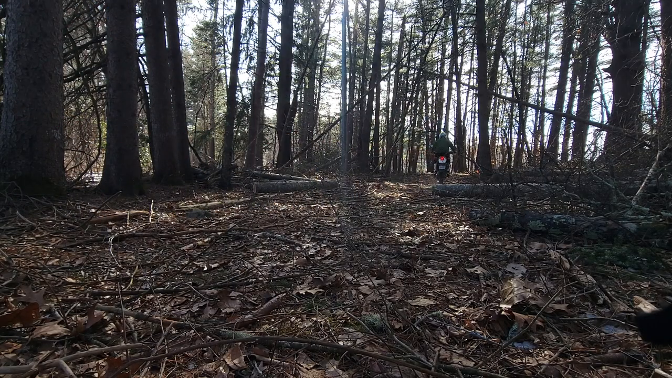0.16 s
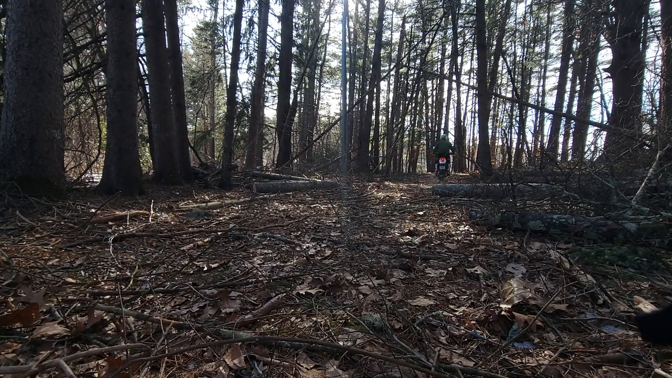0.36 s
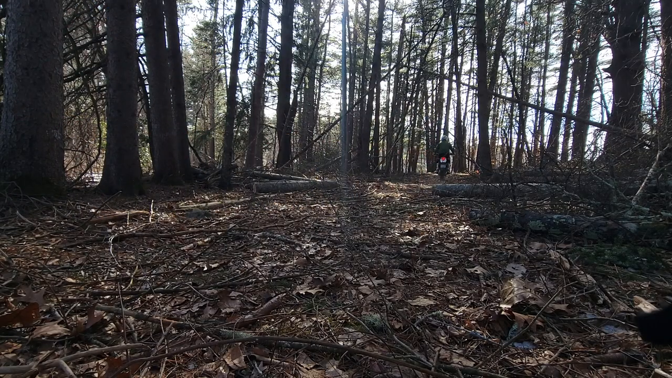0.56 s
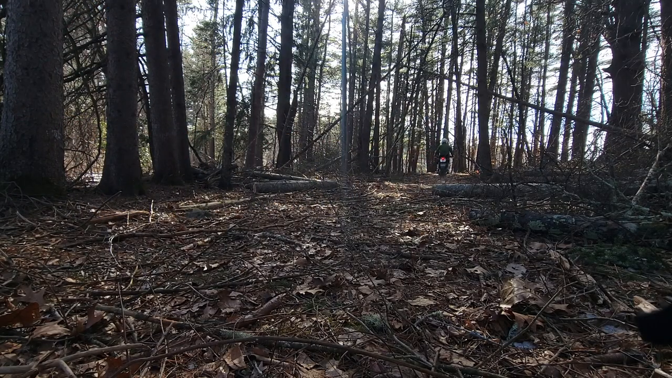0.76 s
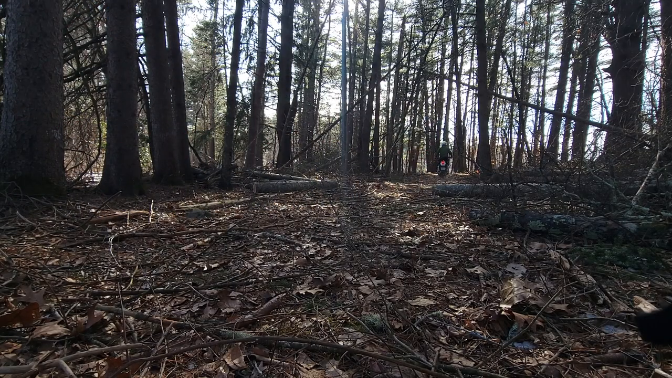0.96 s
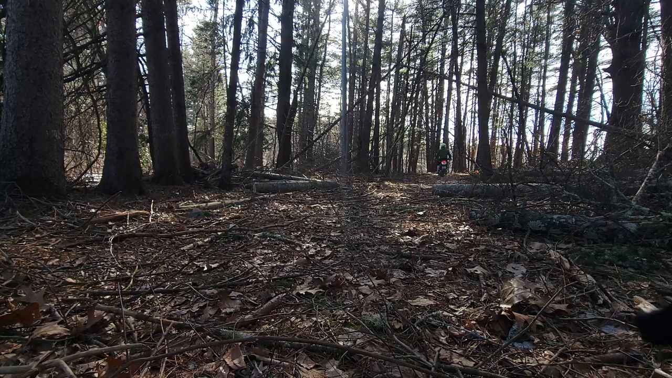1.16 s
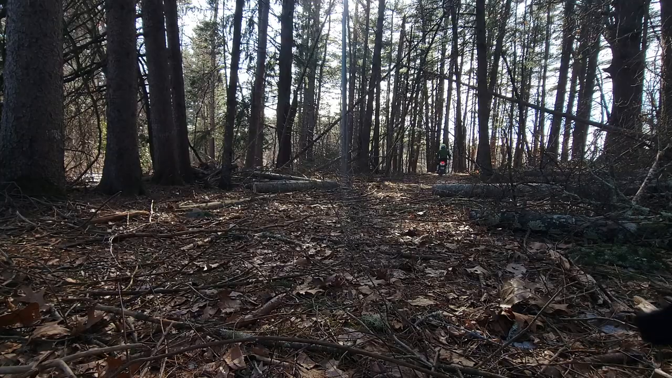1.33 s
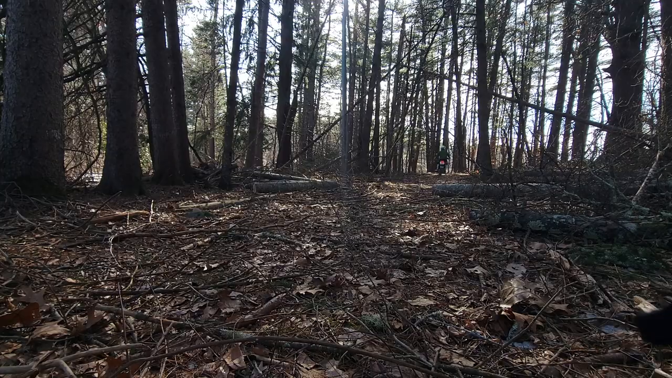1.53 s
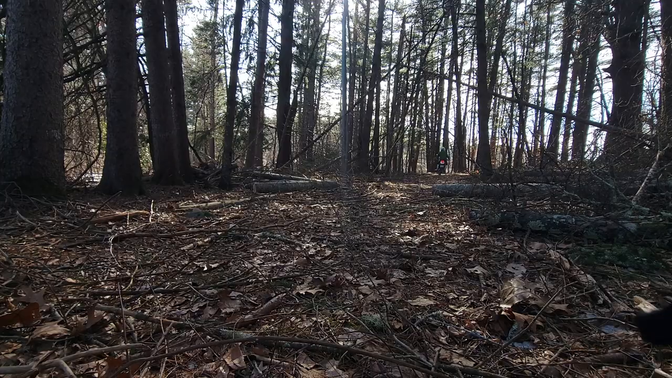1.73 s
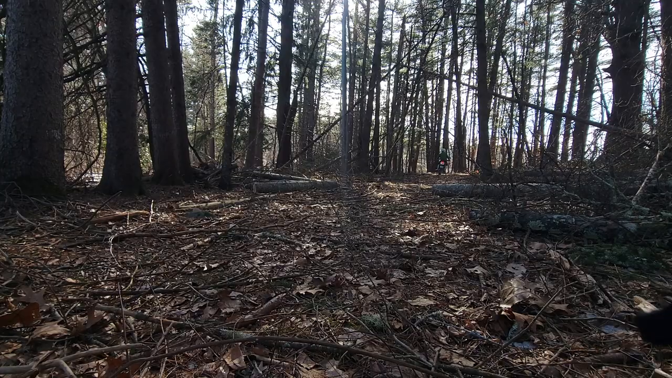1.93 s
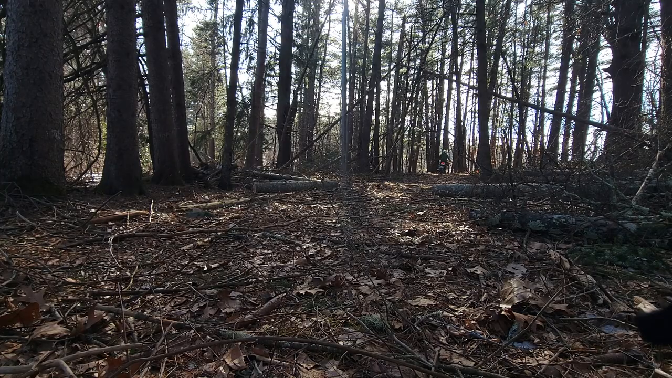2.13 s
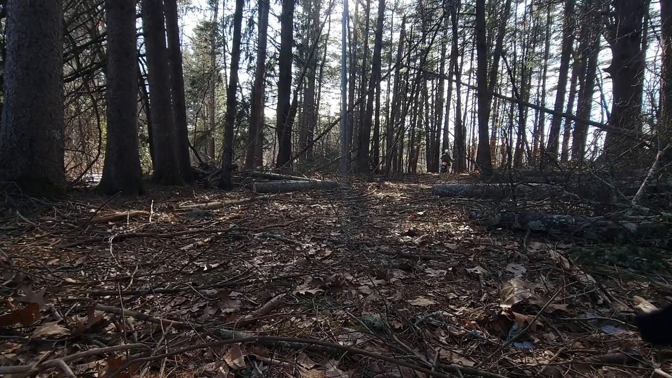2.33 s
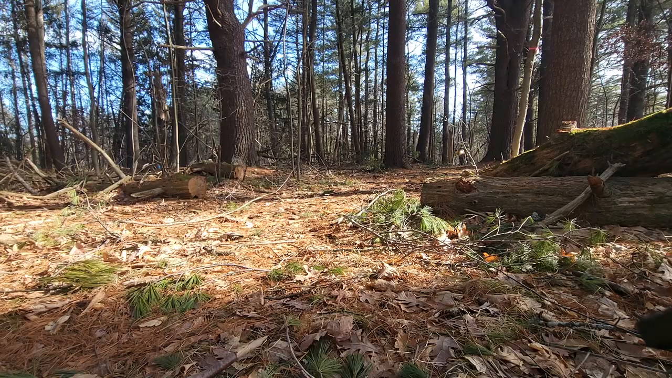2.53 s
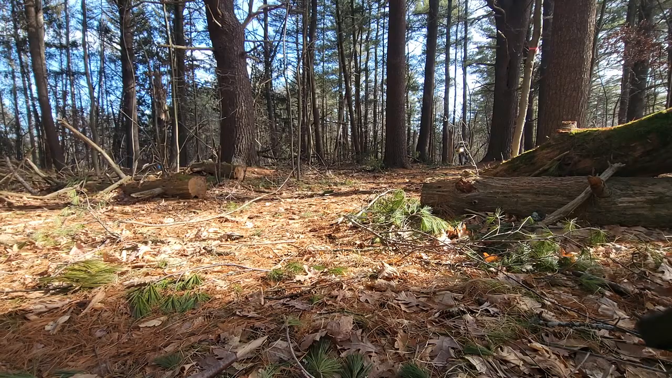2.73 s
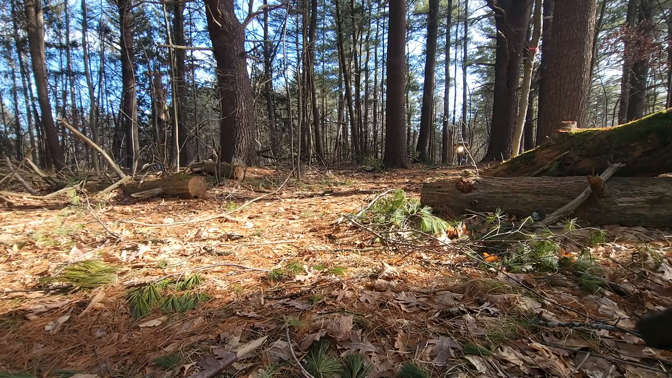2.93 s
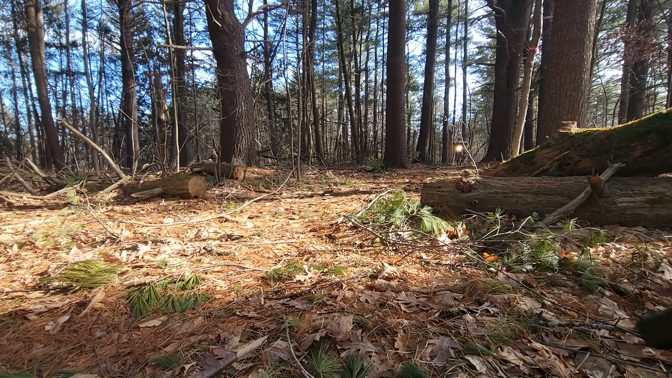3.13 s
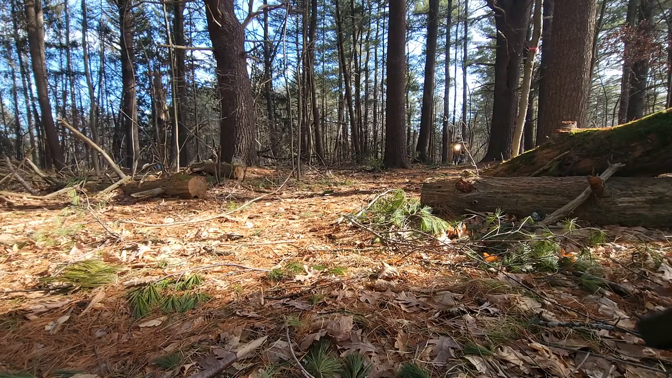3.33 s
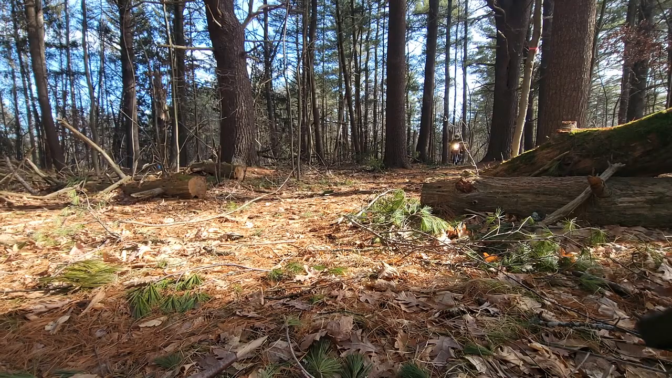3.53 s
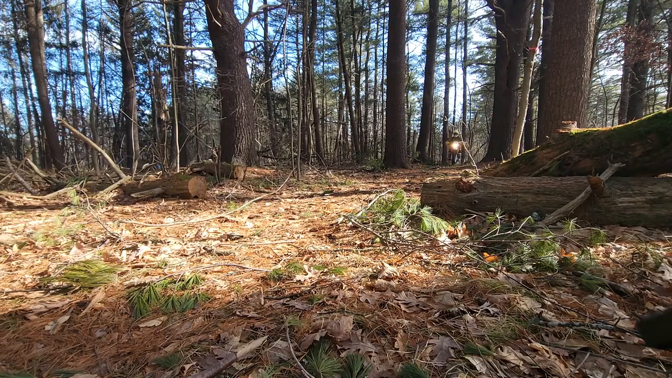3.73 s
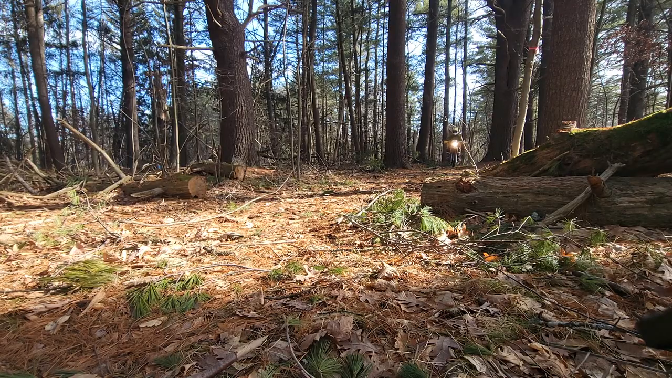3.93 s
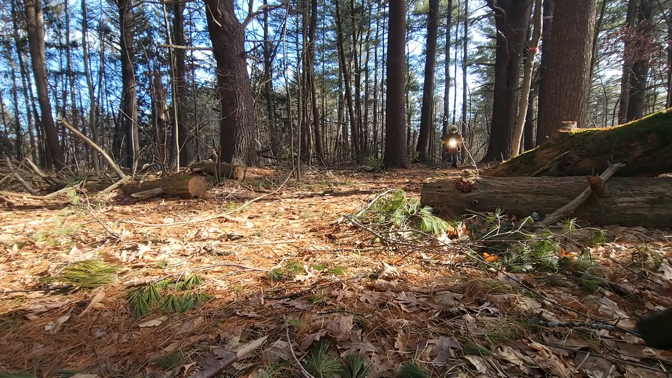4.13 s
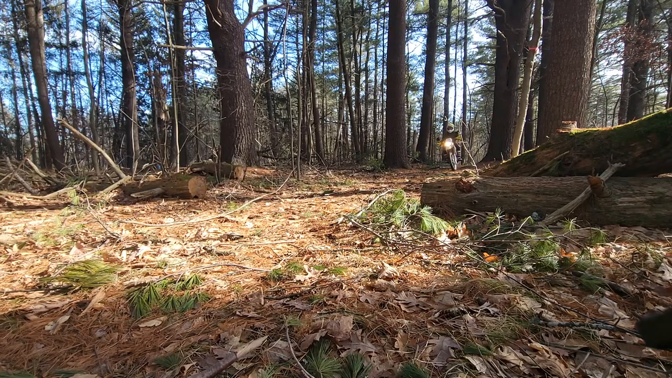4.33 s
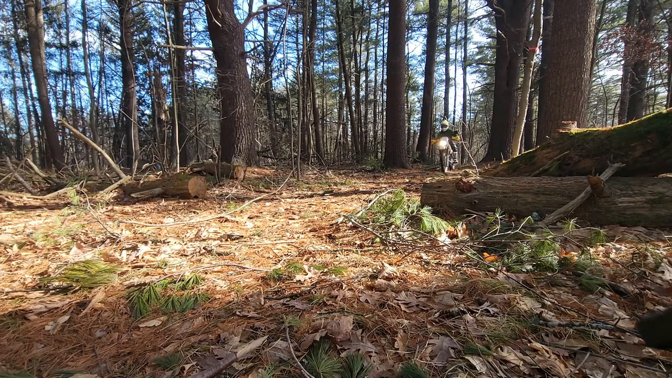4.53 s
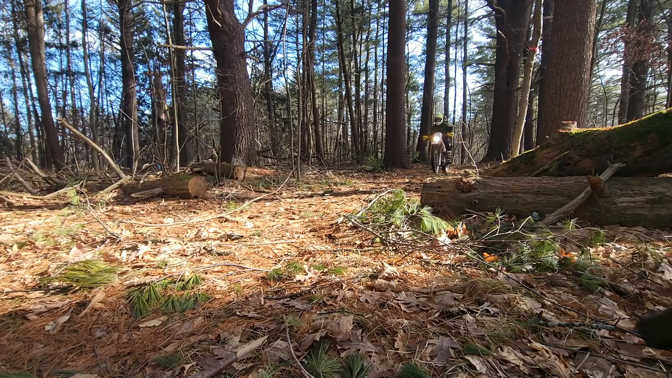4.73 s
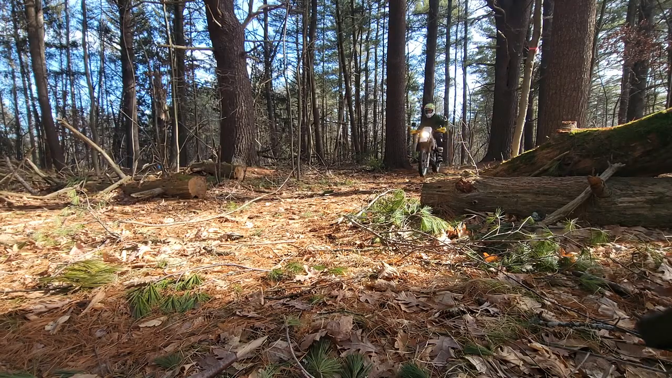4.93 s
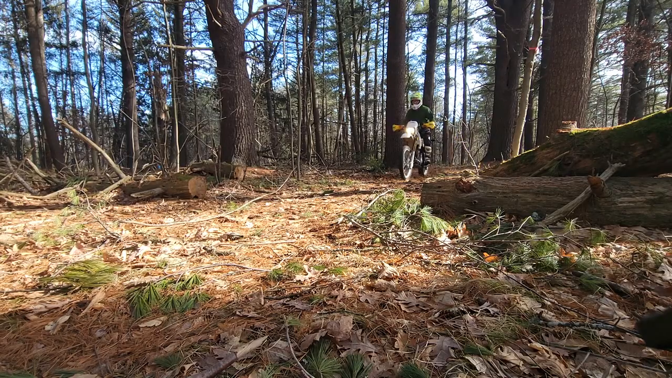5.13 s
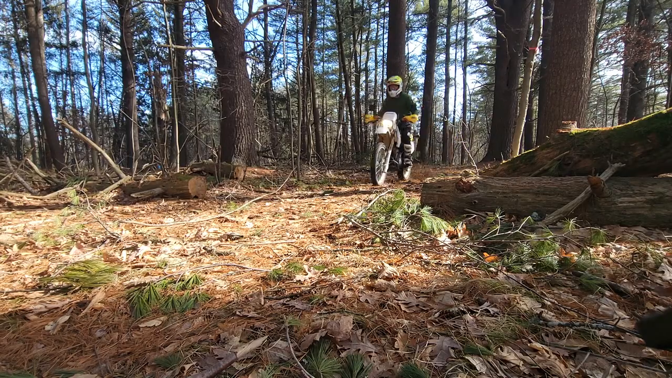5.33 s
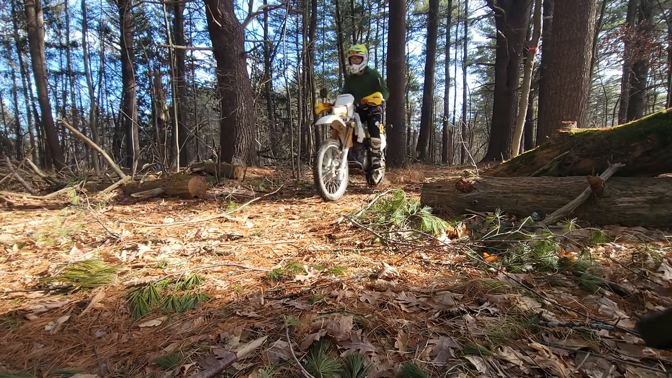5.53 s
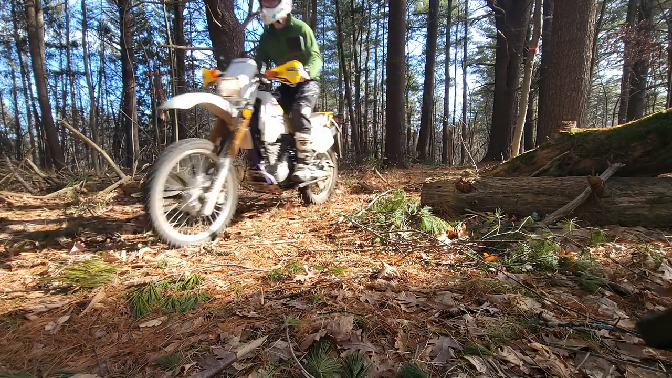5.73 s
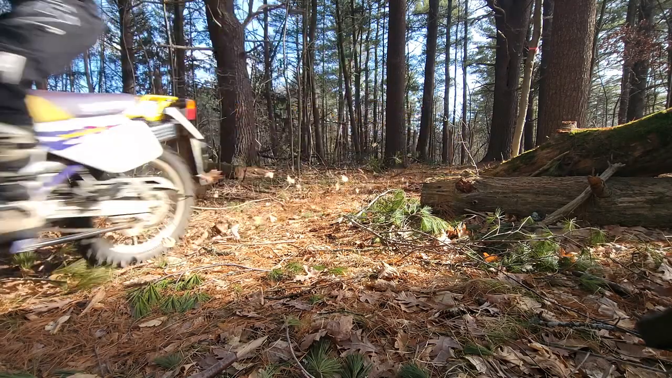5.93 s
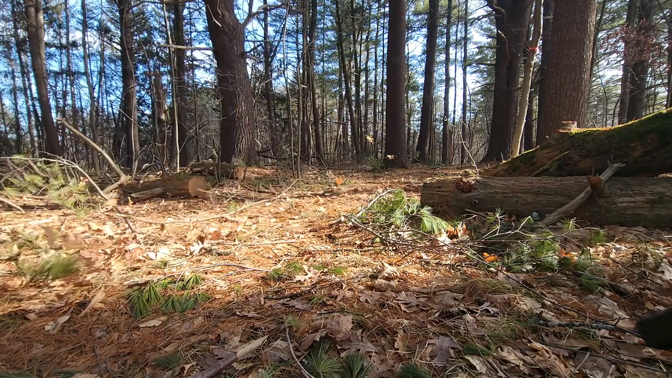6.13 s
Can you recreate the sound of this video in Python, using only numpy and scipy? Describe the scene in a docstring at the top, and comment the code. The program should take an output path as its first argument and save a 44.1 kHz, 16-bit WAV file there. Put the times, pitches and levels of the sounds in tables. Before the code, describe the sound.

Outdoors among trees, two closely spaced microphones lie on the ground. From 0 s a single-cylinder trail bike, slightly right, rides away under throttle: rapid even thuds of about 30 to 36 per second, low throb, raspy bark and puffing gas hiss, dry leaves rustling. Near 0.8 s the throttle closes; the bark drops away and the pitch sags into a darker burble until 2.4 s. At about 2.45 s the sound cuts to another spot, the bike approaching at a distance, rougher, climbing until 3.5 s. It backs off, with a sharp twig snap at 3.83 s, and reaches its lowest note near 4.2 s. From 4.3 s it opens up again, bark, metallic engine ticking and leaf crackle swelling. It passes very close around 5.9 s, sweeping from right to left, and ends still loud at about 6.2 s. Diffuse trunk reflections and faint breeze rumble continue throughout.

```python
"""A single-cylinder trail bike in a forest, heard by two closely spaced ports on the ground: first it rides away
and coasts; then, from another spot, it approaches, opens up and passes close from right to left.
Firings ring the exhaust chambers and pipe over a crank-rate throb; noise puffs once a cycle as gas, ticks ring the
engine cases. Tyres rustle through dry leaves and snap twigs, trunks scatter the sound, a breeze rumbles throughout."""
import sys
import numpy as np
from scipy import signal
from scipy.fft import rfft, irfft, next_fast_len
from scipy.io import wavfile
from scipy.ndimage import uniform_filter1d, map_coordinates

SR = 44100
rng = np.random.default_rng(int(sys.argv[2]) if len(sys.argv) > 2 else 0)


def wrap_up_sound(samples):
    """Save the sound to the file named by the first command line argument, as 16-bit audio."""
    columns = np.atleast_2d(samples).T
    # keep every value between -1 and 1, then stretch to whole-number steps
    tamed = np.clip(columns, -1, 1)
    steps = np.round(tamed * 32767).astype(np.int16)
    wavfile.write(sys.argv[1], SR, steps)


def volts(x):
    """Linear amplitude factor 10**(x/20) for a level x in dB, scalar or array-like."""
    e = np.asarray(x, float) / 20
    return 10 ** e


N = 272531

# the ride, leaving then approaching: [t/s, firing rate f/Hz, throttle 0-1, drone over silencer balance/dB]
ENGINE = [
    [(0.0, 30.52, 0.87, 7), (.13, 32.85, 0.84, -6), (.2, 31.46, 0.91, -11), (.35, 34.2, 0.71, -4),
     (.62, 35.1, 0.78, -1.5), (.74, 36.15, 0.59, -1), (.84, 34.04, 0.2, -3.5), (1.17, 30.48, 0.32, 5),
     (1.5, 28.8, 0.47, -7), (1.83, 26.6, 0.5, -1), (2.13, 25.59, 0.2, 13.5), (2.44, 25.24, 0.03, 0)],
    [(2.46, 28.16, 0.86, -1), (2.55, 29.89, 0.92, 19), (2.66, 30.67, 1, -3), (2.8, 29.3, 0.88, 14),
     (2.98, 33.63, 0.81, -1), (3.13, 36.17, 0.92, 6.5), (3.26, 37.83, 0.65, 0), (3.54, 38.44, 0.8, 1),
     (3.62, 37.2, 0.41, 25), (3.75, 35.16, 0.15, -12), (3.93, 31.63, 0.2, 11), (4.2, 26.04, 0.24, 9),
     (4.26, 26.4, 0.31, 4), (4.33, 27.54, 0.81, 11.5), (4.51, 28.56, 0.62, 15.5), (4.77, 29.02, 0.79, 22),
     (4.89, 31.86, 0.86, -8), (5.03, 33.15, 0.95, -4.5), (5.2, 32.8, 0.75, -14), (5.33, 33.99, 0.92, 3),
     (5.46, 34.93, 0.89, -1), (5.6, 39.23, 0.87, -6), (5.72, 37.58, 0.98, 15), (5.87, 39, 0.83, -2),
     (6.18, 37.8, 0.82, -7)],
]
# sine of the bearing, right positive: [t/s, sine]
BEARING = [(0, .32), (2.44, .32), (2.46, .35), (3.0, .365), (4.5, .335), (4.7, .31), (5.0, .265),
           (5.3, .21), (5.45, .13), (5.6, 0), (5.8, -.33), (5.9, -.6), (6.0, -.87), (6.1, -.93),
           (6.18, -.95)]
LEAVES_FROM_M, LEAVES_M_S = 10.94, 1.7
COMES_M_S, PASSES_S, CLOSEST_M = 5.06, 5.916, 1.905

# source levels at 10 m, before the curves below and the ports: [leaving shut level/dB, leaving open level/dB,
# approaching shut level/dB, approaching open level/dB, share of the distance law, change once past/dB,
# slope/dB per Hz of firing rate above cruising]; "scatter" is the tree tail over the direct hiss
LAYERS = { "throb": (-34.5, -23.5, -44.5, -19.5, 0.57, -3.5, 0.38),
          "drone": (-31.5, -27.5, -36.5, -41.5, 0.83, -6, -0.5),
          "silencer": (-36.5, -29, -45, -40.5, 0.52, 8, 0.28), "pop": (-69, -47, -64, -52.5, 0.79, -7, 1.2),
          "tappet": (-64, -70, -55, -51.5, 1.34, -24, 0.48),
          "roar": (-55, -40.5, -50, -41, 1.2337, -5, 0.47),
          "gas": (-47.5, -34.5, -41.5, -40, 1.1461, -12, 0.27),
          "rustle": (-46, -44, -40.5, -39.5, 1.2464, -15.5, 0.2838),
          "upper": (-42, -47, -37.5, -44.5, 1.49, -10, 0.4),
          "casing": (-46.5, -64, -48.5, -46.5, 1.5, -34, 0.14),
          "scatter": (-4, -8, 0, -6.5, -0.54, -4, 0.03), }
CRUISE_HZ = 32
DRONE_TAKES, SILENCER_GIVES = 0.45, 0.56  # shares of the drone over silencer balance
# depth of the gas puffs 0-1: [leaving shut, leaving open, approaching shut, approaching open]
PUFF = (0.12, 0.77, 0.33, 0.32)
# unevenness of the firings: [leaving shut, leaving open, approaching shut, approaching open]
ROUGH = (.4, .35, 1.1, .65)
CYCLE_AT_START = .82  # the engine is already running, about to fire

# lowest exhaust chamber: [f/Hz, width/Hz, level/dB]
CHAMBER = [(102.2, 43, 0)]
# longest-ringing chamber, filtered twice: [f/Hz, width/Hz of one pass, level/dB]
DRONE = [(126.6, 36.6, -1)]
# the same chamber full of hot gas under load: [f/Hz, width/Hz of one pass, level/dB]
DRONE_HOT = [(140.7, 39.6, 5.5)]
# silencer resonance: [f/Hz, width/Hz, level/dB]
SILENCER = [(174.8, 46.5, 0)]
# three pipe resonances, low to high: [f/Hz, width/Hz, level/dB]
BARK = [(230.8, 76, 0), (296, 52, 0), (373, 88, 0)]
# exhaust bass, leaving then approaching: [t/s, lowest chamber level/dB, firing-rate line level/dB]
BASS_DB = [
    [(0.0, -32, -49), (0.11, -36, -36), (0.7, -38.5, -32), (0.99, -31.5, -43), (1.3, -37, -43.5),
     (1.4, -44, -46), (1.7, -41, -46), (1.81, -31, -48), (2.05, -37.5, -54), (2.33, -31.5, -60),
     (2.44, -32, -47)],
    [(2.46, -34.5, -37), (2.75, -38, -37), (3.0, -32.5, -39.5), (3.1, -38, -44), (3.33, -46, -33),
     (3.52, -38, -40), (3.62, -27, -44), (3.79, -36.5, -41), (3.95, -54, -54), (4.12, -33.5, -47),
     (4.22, -44, -45), (4.33, -28, -33), (4.42, -53, -45), (4.78, -32, -42), (4.89, -25.5, -39),
     (5.3, -30, -37), (5.55, -28.5, -36), (5.72, -23, -34), (5.95, -30.5, -27), (6.18, -27, -31)],
]
# bark colour, leaving then approaching: [t/s, low level/dB, middle level/dB, high level/dB]
BARK_DB = [
    [(0.0, -36.5, -38.5, -33.5), (0.35, -35, -38.5, -34.5), (0.7, -35.5, -39.5, -38),
     (0.85, -46, -58.5, -49.5), (1.0, -48, -48, -48), (1.25, -51, -48.5, -47.5), (1.63, -52, -47, -52),
     (1.85, -48, -42.5, -48), (2.1, -43.5, -44, -54), (2.2, -48, -49, -52), (2.3, -44, -44.5, -50),
     (2.43, -49, -43.5, -53)],
    [(2.47, -43.5, -50.5, -60), (2.89, -48, -42.5, -54), (3.12, -48.5, -75, -45), (3.21, -43, -49, -60),
     (3.51, -38.5, -46, -51), (3.64, -58, -51, -62), (3.76, -53, -47, -64), (3.83, -59, -50, -56),
     (3.9, -59, -60, -77), (4.0, -51, -45, -72), (4.28, -42, -42.5, -56), (4.7, -40.5, -36, -37),
     (4.94, -35.5, -35, -39.5), (5.1, -35.5, -41, -33.5), (5.5, -31.5, -45, -29.5),
     (5.7, -29.5, -37, -35.5), (5.95, -25.5, -63, -23), (6.18, -29.5, -34, -32)],
]

# spectrum of the escaping gas: [f/Hz, level/dB]
GAS = [(500, -2.5), (800, -7), (1200, -3), (1800, -3.5), (2800, -3), (3600, -9.5), (4500, -16.5),
       (7000, -39)]
# mid-band hiss along the trail: [t/s, level/dB]
HISS_DB = [(0, 0), (.4, 1), (.7, 2), (1.2, 3.1), (1.8, 2), (2.43, 6), (2.5, 0.5), (2.8, 3.5), (3.05, 0.5),
           (3.2, 3), (3.6, -2), (3.9, 0.5), (4.1, 0), (4.5, 0), (4.9, 0), (5.3, 1.5), (5.6, 0.5), (5.8, 0),
           (5.95, -0.5), (6.05, -1), (6.18, 1)]
# valve gear rung once a cycle, filtered twice: [f/Hz, width/Hz of one pass, level/dB]
TAPPET = [(6380, 270, -7), (6630, 460, -2.5)]
# engine cases ringing, filtered twice: [f/Hz, width/Hz of one pass, level/dB]
CASING = [(921, 59, 9), (1321, 34, 7), (5387, 150, -2), (5575, 190, 4.5), (5940, 570, -4)]

# leaf rustle along the trail: [t/s, level/dB]
LITTER = [(0, 0.4), (.8, -0.2), (1.4, 5), (2.3, 4), (2.45, -1), (2.8, 1), (3.2, -1.5), (3.65, 0.5),
          (3.92, -9.5), (4.3, -2.5), (4.9, -1.5), (5.4, -1.5), (5.7, 0.6), (5.95, 2), (6.18, -5)]
# twigs snapping under the tyres: [t/s, peak level/dB before colouring]
SNAPS = [(0.069, -20), (3.8273, -2.5), (4.7984, -27), (5.457, -19)]

# share of the far rustle that each port hears on its own: [leaving, approaching]
LEAVES_WIDE = (.5, .1)
GAS_WIDE = 0.2  # share of the hiss that each port hears on its own when the bike is alongside
BIKE_M = 1.97  # length over which leaves rustle
PORT_LAG_MS = .6  # between the ports, for a source fully to one side
PAN_AHEAD_DB, PAN_SIDE_DB = -1.5, 5  # left over right straight ahead; its fall at the far right
TREES_T60_S = 0.7
WIND_DB = -36  # rms at each port, before its colouring

# port resonances, strongest near 6 and 13 kHz: [f/Hz, left level/dB, right level/dB]
PORTS = [(71.4, 4.5, 9), (453, 2, 2.5), (1480, 2.5, 5), (3300, 1, 0.5), (4630, 1.5, 3.5), (5000, 3, 8.5),
         (6250, 5, 11), (7300, 7.5, 11), (8400, -0.5, -7.5), (10670, 5.5, 2.5), (12450, 7, 10.5),
         (14700, 6, 1.5), (17400, -26, -6)]
# stereo width, by sum and difference of the ports: [f/Hz, mid level/dB, side level/dB]
WIDEN = [(60, -0.14, -7.5), (145, 0, -10.5), (286, 0.5, -0.5), (640, -9, -1.5), (1140, -1.5, 3),
         (2330, -0.14, 0.5)]
TOP_HZ = 15850


def level(x, db):
    """Scale to an rms level."""
    return x * volts(db) / np.sqrt(np.mean(x ** 2))


def columns(*tables):
    """Draw table columns as per-sample curves."""
    s, *cols = np.concatenate(tables).T
    return [np.interp(np.arange(N) / SR, s, c) for c in cols]


def colour(x, hz, db):
    """Shape a spectrum through frequency and level points."""
    size = next_fast_len(N)
    f = np.maximum(np.arange(size // 2 + 1) * SR / size, 1)
    gain = volts(np.interp(np.log(f), np.log(hz), db))
    return irfft(rfft(x, size) * gain, size)[:N]


def ring(x, modes, order=2):
    """Sum resonances in phase; order 2 applies each twice for dark valleys."""
    out = 0
    for hz, width_hz, db in modes:
        b, a = signal.iirpeak(hz, hz / width_hz, fs=SR)
        y = x
        for _ in range(order):
            y = signal.lfilter(b, a, y)
        out = out + volts(db) * y
    return out


def band(x, lo_hz, hi_hz):
    """Steep band-pass."""
    return signal.sosfilt(signal.butter(3, [lo_hz, hi_hz], "band", fs=SR, output="sos"), x)


def centred(x, lo_hz, hi_hz):
    """Band-pass without delay, so that the blow stays on the firing."""
    return signal.sosfiltfilt(signal.butter(2, [lo_hz, hi_hz], "band", fs=SR, output="sos"), x)


def walk(rate):
    """Wander between random levels held 1 / rate s and slewed twice; spread near 1."""
    k = int(SR / rate)
    steps = np.repeat(rng.standard_normal(N // k + 1), k)
    return 2.0 * uniform_filter1d(uniform_filter1d(steps, k), k)[:N]


def ride():
    """Throttle, firing rate, distance and facing set roughness, puff depth and the level of every layer."""
    t = np.arange(N) / SR
    hz, throttle, balance_db = columns(*ENGINE)
    throttle = np.clip(throttle, 0, 1)
    litter_db, = columns(LITTER)
    hiss_db, = columns(HISS_DB)
    comes = t > (ENGINE[0][-1][0] + ENGINE[1][0][0]) / 2
    along = COMES_M_S * (t - PASSES_S)
    metres = np.where(comes, np.hypot(along, CLOSEST_M), LEAVES_FROM_M + LEAVES_M_S * t)
    past = comes * (1 + along / metres) / 2  # 0 facing the ports, 1 with its back to them

    def blend(away_shut, away_open, near_shut, near_open):
        """Follow the throttle between its shut and open settings in each half."""
        away = away_shut + (away_open - away_shut) * throttle
        approaching = near_shut + (near_open - near_shut) * throttle
        return np.where(comes, approaching, away)

    db = {}
    for name, (*settings, distance_share, past_db, db_per_hz) in LAYERS.items():
        distance_db = distance_share * 20 * np.log10(10 / metres)
        db[name] = blend(*settings) + distance_db + past_db * past + db_per_hz * (hz - CRUISE_HZ)
    db["drone"] = db["drone"] + DRONE_TAKES * balance_db
    db["silencer"] = db["silencer"] - SILENCER_GIVES * balance_db
    for name in ("rustle", "upper"):
        db[name] = db[name] + litter_db
    for name in ("gas", "roar"):
        db[name] = db[name] + hiss_db
    return hz, throttle, blend(*ROUGH), np.clip(blend(*PUFF), 0, 1), metres, db


def exhaust(hz, throttle, rough, db):
    """Fire every second crank turn to ring chambers and pipe; returns the low tone and place in the cycle."""
    cycles = CYCLE_AT_START + np.cumsum(hz) / SR + 0.007 * rough * walk(25)
    fired = np.flatnonzero(np.diff(np.floor(cycles)) > 0)
    uneven = rng.standard_normal((400, 2))[:len(fired)]
    thud, crack = np.zeros((2, N))
    # firings are even on the smooth way out, ragged over the bumps and on a closed throttle
    ragged = rough[fired]
    thud[fired] = -volts(0.7 * ragged * uneven[:, 0])
    crack[fired] = -volts(ragged * uneven[:, 1])
    # keep power independent of the firing rate
    steady = np.sqrt(np.mean(hz) / hz)

    # once a crank turn, with a line an octave down at the firing rate
    turn = np.sin(4 * np.pi * (cycles + 0.26)) * volts(0.84 * walk(22) + 1.5 * rough * walk(9))
    chamber_db, firing_db = columns(*BASS_DB)
    firing = np.sin(2 * np.pi * (cycles + 0.25)) * volts(firing_db + 0.5 * walk(4))
    throb = np.sqrt(2) * (volts(db["throb"]) * turn + firing)

    chamber = centred(ring(thud, CHAMBER, order=1), 80, 127.6)
    chamber = volts(chamber_db) * level(steady * chamber, 0)
    # opening the throttle fades from the cool chamber to the hot one
    drone = (1 - throttle) * ring(thud, DRONE) + throttle * ring(thud, DRONE_HOT)
    drone = volts(db["drone"]) * level(steady * drone, 0)
    silencer = centred(ring(thud, SILENCER, order=1), 120.6, 192.3)
    silencer = volts(db["silencer"]) * level(steady * silencer, 0)
    bark = 0
    for mode, part_db in zip(BARK, columns(*BARK_DB)):
        mode_hz, width_hz, _ = mode
        part = centred(ring(crack, [mode], order=1), mode_hz - width_hz, mode_hz + width_hz)
        bark = bark + volts(part_db) * level(steady * part, 0)

    # turbulent flow fills the gaps between the low lines
    turbulence = level(band(rng.standard_normal(N), 30, 190), -13.5)
    flutter = rough * volts(db["drone"]) * turbulence
    return throb + chamber + drone + flutter + silencer + bark, cycles % 1


def hiss(phase, depth, db):
    """Puff gas noise after each firing, while the valve gear rings the cases."""
    puff = 1 - depth + 2.0 * depth * np.exp(-phase / 0.15)
    roar = band(rng.standard_normal(N), 353, 854) * np.sqrt(puff)
    gas = colour(rng.standard_normal(N), *np.transpose(GAS)) * puff * volts(1.2 * walk(12))
    # every firing starts with a crisp pop
    pop = band(np.diff(phase, prepend=0) < 0, 530, 2850)
    # valves tick four times a cycle
    ticks = rng.standard_normal(N) * (2.0 + np.exp(-(4 * phase % 1) / 0.17)) * volts(2.5 * walk(60))
    tap = rng.standard_normal(N) * np.exp(-((phase - 0.3) % 1) / 0.12) * volts(3.2 * walk(25))
    layers = dict(tappet=ring(tap, TAPPET), roar=roar, pop=pop, gas=gas, casing=ring(ticks, CASING))
    return sum(volts(db[name]) * level(x, 0) for name, x in layers.items())


def leaves(phase, depth, db, count):
    """Crackle leaves under the tyres; count patches share one flicker but have their own grains."""
    crackle = volts(1.3 * walk(150)) * (1 + 0.33 * depth * np.exp(-phase / 0.12))
    grains = rng.standard_normal((count, N)) * crackle
    rustle = band(grains, 3020, 8980) * volts(0.7 * walk(10))
    upper = band(grains, 12950, .45 * SR) * volts(0.58 * walk(15.0))
    return volts(db["rustle"]) * level(rustle, 0) + volts(db["upper"]) * level(upper, 0)


def snaps():
    """Snap twigs as short noise bursts with a quick rise and a few ms of decay."""
    out, t = np.zeros(N), np.arange(900) / SR
    shape = np.minimum(t / .004, 1) ** 2 * np.exp(-t / .0025)
    bursts = rng.standard_normal((len(SNAPS), len(t))) * shape
    for (s, db), burst in zip(SNAPS, bursts):
        i = int(s * SR)
        out[i:i + len(t)] += volts(db) * burst / np.abs(burst).max()
    hz = [150, 260, 420, 900, 3500, 7000, 11000, 16000]
    return colour(out, hz, [7, 6, -3, -20, -2.5, -5.0, -11.0, -14])


def trees(x):
    """Trunks return a diffuse tail, unrelated at the two ports; long waves bend round them."""
    t = np.arange(SR // 2) / SR
    decay = volts(-60 * t / TREES_T60_S)
    tails = rng.standard_normal((2, len(t))) * decay * np.minimum(t / 0.019, 1)
    tails /= np.sqrt(np.sum(tails ** 2, axis=1, keepdims=True))
    return signal.fftconvolve(band(x, 122, .45 * SR)[None], tails, axes=1)[:, :N]


def wind():
    """A light breeze rumbles on each port by itself, as low noise of wandering level."""
    rumble = [band(rng.standard_normal(N), 45, 156) * volts(2.3 * walk(7.04)) for _ in range(2)]
    return level(np.array(rumble), WIND_DB)


def scene():
    """The bike reaches the nearer port first, panned in level by its bearing; the trees add their tail."""
    bearing, = columns(BEARING)
    hz, throttle, rough, depth, metres, db = ride()
    tone, phase = exhaust(hz, throttle, rough, db)
    gas, *own_gas = (hiss(phase, depth, db) for _ in range(3))
    shared_leaves, *own_leaves = leaves(phase, depth, db, count=3)
    twigs = snaps()

    # direct and scattered hiss share the power
    near = 1 / np.sqrt(1 + volts(2 * db["scatter"]))
    # close by, the bike is wide and each port hears its own patch of leaves
    far_share = np.where(np.arange(N) / SR < ENGINE[1][0][0], *LEAVES_WIDE)
    wide = np.minimum((BIKE_M / metres) ** 2 + far_share, 1)
    spread = GAS_WIDE * wide ** 2
    common_hiss = np.sqrt(1 - spread) * gas + np.sqrt(1 - wide) * shared_leaves
    own_hiss = np.sqrt(wide) * own_leaves + np.sqrt(spread) * own_gas
    point = tone + near * common_hiss + twigs

    sides = np.array([[1], [-1]])  # left, right
    read_at = np.arange(N) - sides * bearing * PORT_LAG_MS / 1000 * SR / 2
    delayed = np.array([map_coordinates(point, [a], order=3, mode="nearest") for a in read_at])
    pan = volts(sides * (PAN_AHEAD_DB - PAN_SIDE_DB * bearing) / 2)
    direct = (delayed + near * own_hiss) * pan
    to_trees = gas + shared_leaves + 0.8 * tone + 0.5 * twigs
    scattered = trees(near * volts(db["scatter"]) * to_trees)
    return direct + scattered + wind()


def band_limit(x):
    """A steep low-pass at the top of the band."""
    return signal.sosfilt(signal.butter(12, 16500, fs=SR, output="sos"), x)


def record(dry):
    """Port resonances, stereo width, soft rounding of the loudest peaks, a steep top cut."""
    hz, left_db, right_db = np.transpose(PORTS)
    left, right = colour(dry[0], hz, left_db), colour(dry[1], hz, right_db)
    hz, mid_db, side_db = np.transpose(WIDEN)
    mid = colour((left + right) / 2, hz, mid_db)
    side = colour((left - right) / 2, hz, side_db)
    rounded = np.tanh(0.54 * np.array([mid + side, mid - side])) / 0.71
    top_cut = signal.ellip(8, .2, 70, TOP_HZ, fs=SR, output="sos")
    mix = signal.sosfilt(top_cut, rounded)
    return band_limit(mix)


dry = scene()
out = record(dry)
wrap_up_sound(out)
```